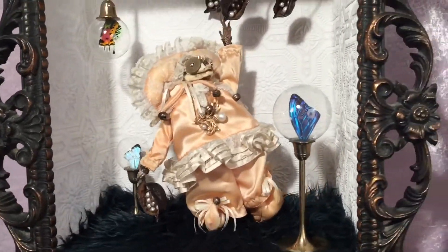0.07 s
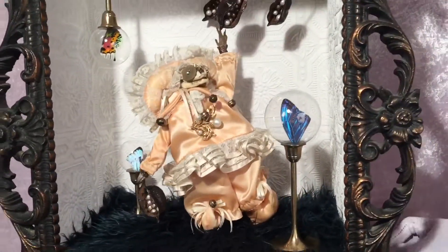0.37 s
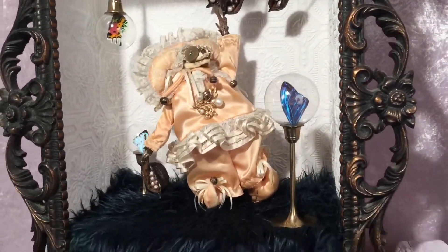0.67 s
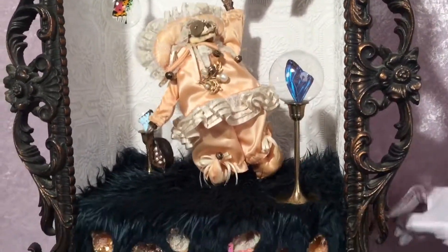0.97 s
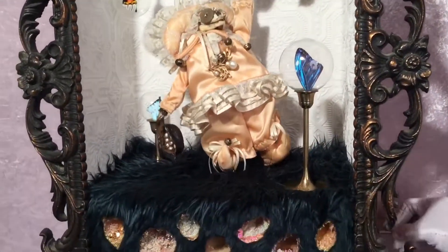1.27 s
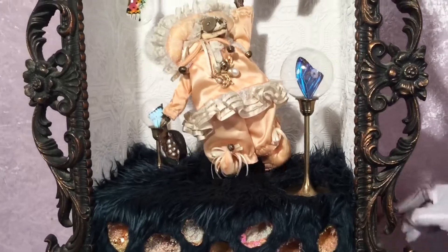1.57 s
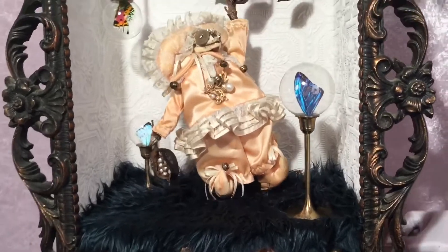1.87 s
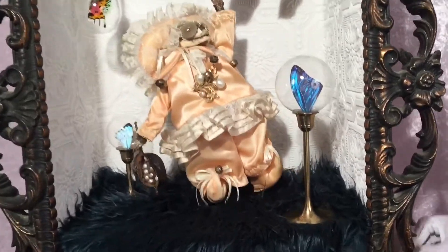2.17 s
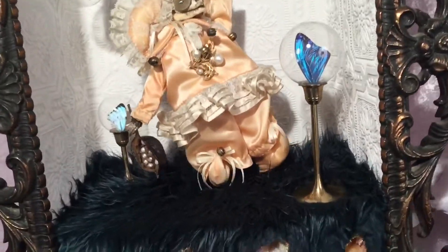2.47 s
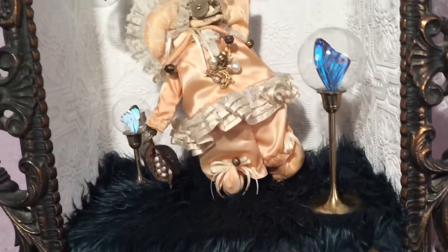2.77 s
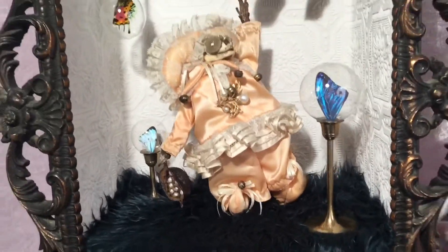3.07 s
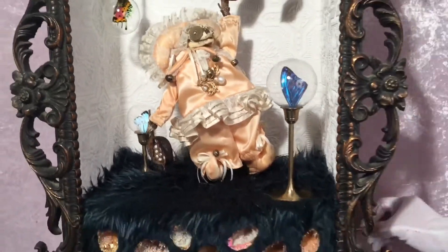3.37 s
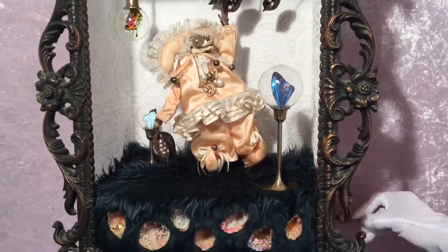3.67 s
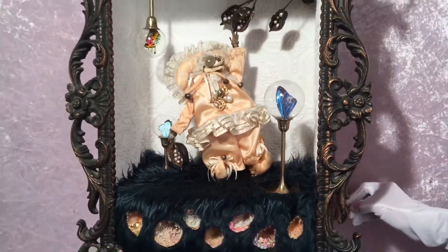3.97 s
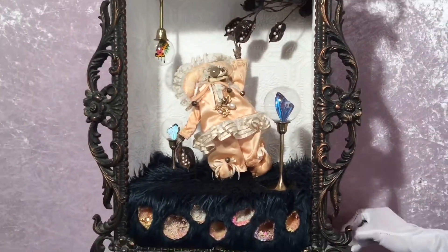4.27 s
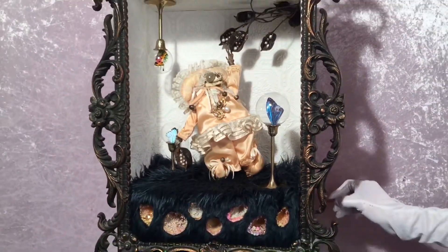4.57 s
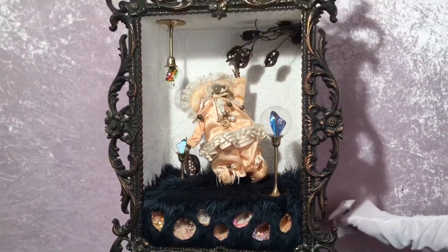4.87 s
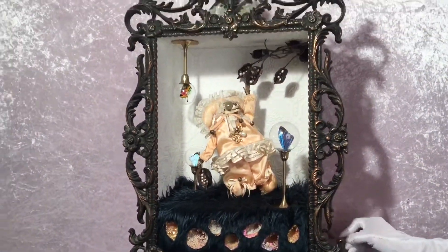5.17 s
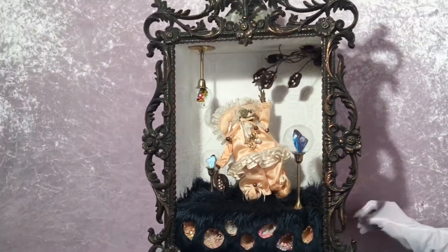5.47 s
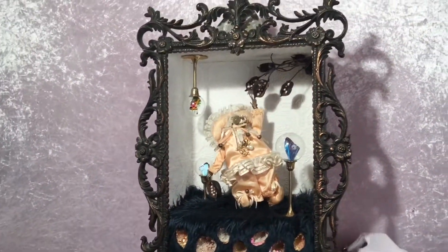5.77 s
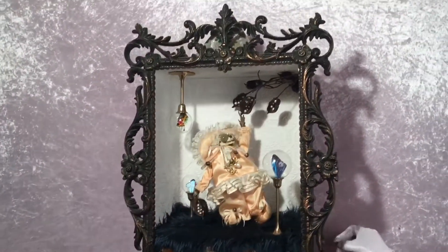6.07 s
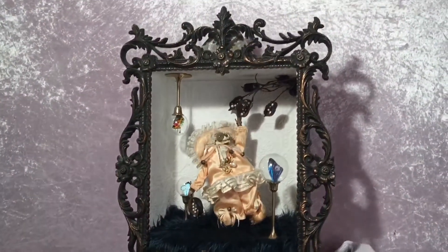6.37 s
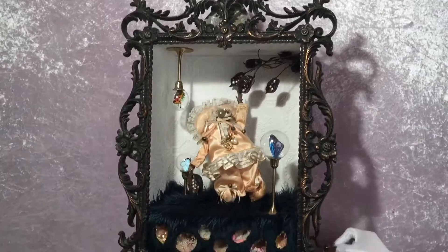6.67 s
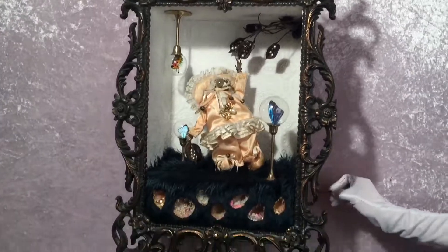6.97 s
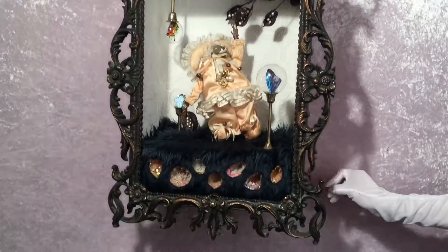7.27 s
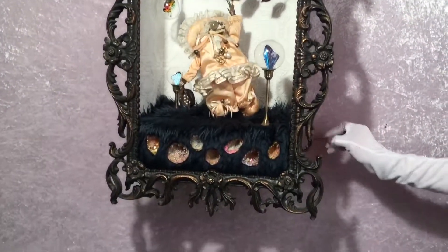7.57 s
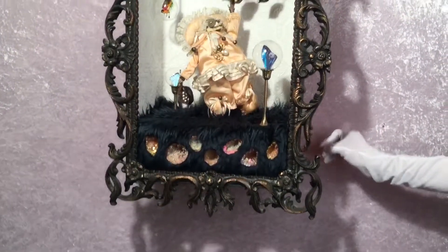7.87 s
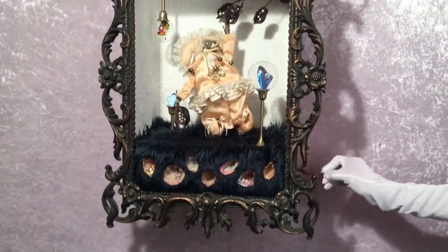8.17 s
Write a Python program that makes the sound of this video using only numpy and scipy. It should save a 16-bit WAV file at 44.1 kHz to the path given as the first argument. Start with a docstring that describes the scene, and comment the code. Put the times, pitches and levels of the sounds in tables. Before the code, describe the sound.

A hand-cranked wooden mechanism clacks and knocks in a repeating pattern while small metal trinkets jingle faintly in a quiet room.

```python
"""A hand-cranked cam works an automaton in a wooden wall case, about 0.7 s a turn, briskest at first.
Each turn the cam lifts its follower, a lever clucks, the cam drags and snaps past, and the follower
drops and rebounds. Each impact excites the damped modes of case, levers and wire links; stick-slip
friction drives the rubs and the shaft's murmur. Small metal trinkets jingle on the shaking figure.
Behind them, in a small quiet room, lie a low rumble and a drone and soft hiss that come and go."""
import sys
import numpy as np
from scipy import signal
from scipy.fft import rfft, irfft, next_fast_len
from scipy.io import wavfile
from scipy.ndimage import uniform_filter1d

SR = 44100
rng = np.random.default_rng(int(sys.argv[2]) if len(sys.argv) > 2 else 0)


def log_audio(samples):
    """Write samples as a 16-bit WAV file to the path given in sys.argv[1]."""
    # one column per channel
    frames = np.atleast_2d(samples).T
    # limit to full scale, then quantise
    limited = np.clip(frames, -1, 1)
    pcm = np.round(limited * 32767).astype(np.int16)
    wavfile.write(sys.argv[1], SR, pcm)


N = 370881
TIME = np.arange(N) / SR
AGE = np.arange(SR // 4) / SR  # time since a blow [s]

# the cam meets its follower: (time [s], strength [dB], lever pitch [Hz], tick [dB], rub after it [dB])
CAM_LIFTS = [(.627, 3.5, 910, -64, -46.5), (1.284, 3, 930, -61, -45), (1.945, 2, 900, -61.5, -46.5),
             (2.604, 5, 920, -60, -46.5), (3.418, -3, 740, -71, -49), (4.153, -2, 740, -72, -52.5),
             (4.943, -0.5, 712, -57, -52), (5.751, -4.5, 700, -51, -52), (6.476, -2, 708, -65, -54),
             (7.24, -1, 680, -75, -48.5), (7.978, -1.5, 723, -59, -51.5)]
# the cam snaps past: (time [s], strength [dB], tap before it [dB], drag [dB], lead of the tap [s])
CAM_SNAPS = [(0.125, 2.5, 3, -41, 0.024), (0.808, 1, 0.5, -45, 0.023), (1.482, 6.5, 6, -35, .019),
             (2.116, 3, 6.5, -39, 0.019), (2.784, -2, 2, -55, .028), (3.593, 3, 2.5, -41.5, 0.02),
             (4.33, -1, 2.5, -42.5, .023), (5.12, -2, 0, -44, .022), (5.908, 1.5, 3, -37, .018),
             (6.656, -2.5, 2, -41.5, 0.023), (7.396, 1.5, 3.5, -41, 0.021), (8.143, 1.5, 4, -42, 0.02)]
# the follower drops: (time [s], strength [dB], case pitch [Hz], lever pitch [Hz], hardness [dB])
FOLLOWER_DROPS = [(.289, 5, 214, 920, -0.5), (0.983, 1, 207, 825, 1), (1.616, 6.5, 193, 1080, -3.5),
                  (2.295, 3, 244, 915, 2), (2.991, 4, 293, 930, 0.5), (3.78, 0, 224, 623, 2.5),
                  (4.528, -0.5, 246, 1010, -3), (5.334, -0.5, 242, 770, -1.5), (6.06, -0.5, 253, 1000, -7),
                  (6.842, 0, 226, 1050, 0.5), (7.557, 2, 254, 964, -9), (8.292, 2, 246, 980, -4)]
# it lands again: (time [s], strength [dB], hardness [dB], case pitch [Hz], lever pitch [Hz])
FOLLOWER_REBOUNDS = [(.371, 3, 3, 330, 810), (1.063, -2, 0.5, 328, 685), (1.696, 1.5, 6.5, 346, 800),
                     (2.373, 4, 3, 323, 1020), (3.059, -5, -3, 180, 907), (3.842, -5, 5.5, 320, 770),
                     (4.588, -3.5, -14, 259.7, 934), (5.404, -4.5, -15, 175.5, 1045),
                     (6.121, -4.5, -5, 266, 710), (6.898, -10.5, -5, 259, 700),
                     (7.621, -3.5, -1.5, 255, 696), (8.364, -1.5, -3, 249, 720)]
# a lever swings over with a hollow cluck: (time [s], strength [dB])
LEVER_CLUCKS = [(.059, 1.5), (0.737, -0.5), (1.415, -3.5), (2.053, 2), (2.704, 4), (3.527, -0.5),
                (4.266, -1), (5.05, -3), (5.854, -2), (6.591, -3.5), (7.336, -0.5), (8.082, -2.5)]
# a lever jumps against its stop: (time [s], strength [dB]); the first row is the linkage clacking under a lift
# that began just before the sound starts
LEVER_JUMPS = [(.008, 0), (0.676, -8.5), (1.343, -1.5), (2.659, 1), (4.998, -8)]
# a lever bounces back on its stop: (time [s], strength [dB])
STOP_BOUNCES = [(3.612, -14), (4.345, -10), (5.924, -4.5), (6.135, -1), (6.673, -3), (7.416, -5),
                (7.637, 5), (8.16, -5), (8.377, 3.5)]
# a wire link shifts in its eye: (time [s], strength [dB], favoured pitch [Hz])
LINK_SHIFTS = [(0.408, -3.5, 2700), (1.152, -0.5, 1600), (1.733, 6.5, 1620), (2.317, -3, 1250),
               (6.04, -12, 1620), (7.484, -7, 1620)]
# the pawl ticks between the strokes: (time [s], strength [dB], lever pitch [Hz])
PAWL_CONTACTS = [(.58, -7, 900), (1.116, -4, 950), (1.246, 3, 644), (2.558, 0, 978), (2.955, 1.5, 950),
                 (3.158, 0.5, 850), (3.31, 0.5, 746), (3.358, 1.5, 950), (3.897, 3, 730), (4.43, -5, 902),
                 (4.645, -12, 930), (4.735, -3, 660), (4.86, -8, 889), (5.64, -4.5, 710),
                 (5.692, -3.5, 940), (6.183, -4, 940), (6.378, -8, 700), (6.42, 0, 956), (6.93, 0, 726),
                 (6.99, -0.5, 930), (7.141, -1, 714), (7.183, 1, 940), (7.69, -3, 930), (7.93, -2, 990)]
# a loose part bumps the case: (time [s], strength [dB], case pitch [Hz])
CASE_BUMPS = [(0.217, -1.5, 310), (0.272, 6, 312), (.458, -3.5, 210), (0.522, -10, 174), (.902, 1, 185),
              (.961, 0, 308), (1.151, -1.5, 190), (1.213, -4, 174), (1.558, 5, 195), (1.599, 8, 201),
              (1.847, -6.5, 179), (2.204, 0, 306), (2.277, 0.5, 340), (2.46, -2.5, 206), (2.524, -1, 169),
              (2.897, -0.5, 289.6), (3.158, -7.5, 160), (3.305, 0, 177), (3.751, 0.5, 202),
              (4.426, -9, 167.1), (4.862, -4, 170.3), (5.99, -1, 183), (6.038, 4, 193), (6.22, -8, 180),
              (6.753, -5.5, 176), (7.477, -1, 183), (7.543, 2.5, 240), (8.225, 1.5, 196), (8.279, 0, 252)]
# briskness of the crank: (time [s], gain on slack knocks and shaft [dB])
CRANK_VIGOUR = [(0, 8), (1.6, 6), (2.6, 8.5), (3.3, 5), (4.7, 2), (5.6, 3), (6.3, -1.5), (7.8, -3),
                (8.4, 5)]
# trinkets strike each other: (time [s], level [dB], favoured pitch [Hz])
TRINKET_CLINKS = [(.038, -52, 14230), (.06, -55, 14230), (.205, -48, 14290), (.39, -47, 14150),
                  (.438, -45, 14240), (.507, -52, 14650), (1.087, -52, 14580), (1.625, -45, 14220),
                  (1.755, -39, 13500), (1.778, -36, 14200), (1.8, -40, 12630), (2.117, -59, 14700),
                  (2.147, -44, 14690), (2.43, -35, 15600), (2.447, -25.5, 14200), (2.5, -38, 14240),
                  (2.682, -63, 13570), (3.063, -65, 14490), (3.123, -58, 14330), (3.862, -48, 14270),
                  (4.234, -59, 14350), (4.609, -52, 14180), (5.536, -69, 13610), (5.825, -68, 14350),
                  (6.141, -57, 12590), (6.191, -64, 14520), (7.316, -53, 14360), (7.43, -67, 13600),
                  (7.623, -62, 13610), (7.638, -61, 14400), (7.766, -68, 13610), (8.394, -64, 12960)]
# spells in which trinkets keep brushing: (start [s], length [s], level [dB], favoured pitch [Hz])
JINGLE_SPELLS = [(0.407, 0.088, -43, 15400), (0.495, 0.079, -60, 14700), (0.646, 0.085, -59, 14600),
                 (.81, 0.19, -70, 14700), (1.098, 0.14, -57.5, 14200), (1.308, 0.05, -72, 15900),
                 (1.723, 0.085, -41, 15400), (1.836, 0.09, -55, 14600), (1.932, 0.115, -51, 14650),
                 (2.405, .12, -42, 14800), (2.613, 0.16, -71, 14500), (5.394, 0.15, -76, 13700),
                 (5.806, 0.21, -73, 13500), (6.897, 0.057, -73, 14200), (7.673, .04, -66, 14500)]
# small beads tick together: (time [s], level [dB])
BEAD_TICKS = [(.136, -57.5), (.808, -77), (.821, -71), (.892, -67), (1.086, -59), (1.13, -60.5),
              (1.841, -55.5), (2.209, -66), (2.519, -55), (2.549, -67), (2.788, -74), (3.034, -64),
              (3.17, -68), (3.911, -63), (6.191, -66.5), (7.406, -60), (7.622, -65)]
# low drone: (time [s], pitch [Hz], fundamental [dB], octave [dB])
DRONE_COURSE = [(1.55, 50.8, -73, -69), (1.77, 51.16, -48.5, -52), (2.3, 54.2, -57, -51),
                (2.65, 56.5, -59, -53), (2.85, 56.8, -70, -56), (3.05, 60.8, -62, -43.5),
                (3.25, 62.6, -50, -44.5), (3.5, 63.4, -67, -64), (3.95, 71, -60.5, -55.5),
                (4.2, 74, -57.5, -49), (4.55, 78.9, -46.5, -50.5), (4.88, 79.8, -41.5, -44),
                (5, 75.6, -57.5, -60), (5.3, 74.3, -66, -85)]
# course of the low rumble: (time [s], level [dB])
RUMBLE_LEVELS = [(0, -50), (1, -59.5), (2.8, -53), (4, -60), (5.7, -58.5), (6.4, -65), (8.4, -67)]

# normal modes of each body: (frequency [Hz], level [dB], t60 [s])
CASE_MODES = [(168.5, -7.5, 0.2), (187.4, 2, 0.12), (217.5, -1, 0.09), (244.1, 1, 0.1), (264.7, -0.5, .15),
              (310.2, -1.5, 0.17), (341.3, -2.5, .08), (379.6, -3, 0.15), (431.2, -2.5, 0.18),
              (521, -10.5, 0.17), (550, -5.5, 0.11)]
LEVER_MODES = [(677, -8.5, 0.038), (706.5, -3.5, 0.16), (738.7, -3, 0.081), (854.6, -2, 0.073),
               (885, -1.5, 0.021), (933.7, 0.5, 0.076), (958.4, -5, 0.11), (1130, -8, 0.051)]
LINK_MODES = [(1238, 8.5, 0.038), (1383, -0.5, .04), (1572, 1, 0.05), (1624, 0.5, 0.068), (1747, -5, 0.044),
              (1894, -10, 0.042), (2090, -8, 0.057), (2410, -8, 0.048), (2667, -6.5, 0.02),
              (2977, -11.5, 0.03), (3364, -8.5, 0.013), (3380, 2.5, 0.014), (3926, -7.5, 0.027),
              (4576, -7.5, 0.026), (6220, -18.5, 0.035)]
FOLLOWER_MODES = [(1050, 8, 0.012), (1210, -23, 0.065), (1613, 20.5, 0.038), (1515, 5, 0.065),
                  (1828, -2, 0.11), (2600, -19.5, 0.036), (3270, -14, 0.022)]
TRINKET_MODES = [(7100, -19, .04), (12630, -2, .04), (13500, -3, .045), (14200, 0, .07), (14350, -4, .04),
                 (14700, -1, .04), (14950, -5, .03), (15600, -3, .04)]

# spectral envelope of each noise: (frequency [Hz], relative level [dB])
CONTACT_SPECTRUM = [(600, -9), (1100, 10.5), (1600, -9), (2000, -5), (2800, -6.5), (3400, -13.5),
                    (4200, -16.5), (4750, -18), (5600, -19.5), (7400, -36), (16000, -37.5)]
CLINK_SPECTRUM = [(4000, -32), (6200, -5), (7200, -1), (10000, -7), (12500, -1.5), (14500, -3.5),
                  (16000, -3.5)]
BEAD_SPECTRUM = [(3000, -39), (5800, -5.5), (7100, 1.5), (8200, -14), (9500, 2), (11200, -4), (12500, 0),
                 (16000, -3)]
SHAFT_SPECTRUM = [(40, -24), (80, -23), (120, -18.5), (170, 1.5), (310, -1.5), (480, -10.5), (720, -7),
                  (950, -18), (1150, -17.5), (1650, -24), (2300, -32.5), (4000, -34.5), (8000, -67)]
RUMBLE_SPECTRUM = [(20, -30), (48, -3), (75, -5.5), (120, 1.5), (220, -17), (600, -47.5)]
HISS_SPECTRUM = [(800, 1), (2000, 9.5), (4000, 4.5), (6000, 0), (7500, -9), (9500, 1.5), (11500, -8),
                 (16000, -7)]
AIR_SPECTRUM = [(12, -64), (25, -33.5), (50, -6.5), (100, -15), (175, -1), (260, 4), (450, -36), (700, -51),
                (1260, -26), (3000, -29.5), (6000, -35), (14500, -43), (16000, -38.5)]


def knock(db, thump_db, clack_db, tick_db, case_hz, lever_hz, link_hz=1500, rattle_s=0.01):
    """Impact excitation: contact and links respond first, then the lever, last the heavy case."""
    struck = favour(CASE_MODES, case_hz, width_hz=29.3, depth_db=11.5)
    thump = ring(CASE_MODES, scatter_db=4, detune=0.0093, favour_db=struck, spread=0.25) * swell(0.0023)
    struck = favour(LEVER_MODES, lever_hz, width_hz=110, depth_db=10.5)
    clack = ring(LEVER_MODES, scatter_db=4.5, detune=0.014, favour_db=struck, spread=0.14)
    clack = clack * swell(0.0012) * np.exp(-AGE / 0.15)  # the stop damps the lever
    struck = favour(LINK_MODES, link_hz, width_hz=590, depth_db=9.5)
    link = ring(LINK_MODES, scatter_db=5, detune=0.024, favour_db=struck) * swell(0.00062)
    bounces = chatter(gap_s=0.0064, fade_s=rattle_s, contact_s=0.0025)
    tick = shape(rng.standard_normal(len(AGE)) * bounces * swell(0.0013), CONTACT_SPECTRUM)
    contact = unit(link) + amp(-0.5) * unit(tick)
    return amp(db) * (blow(thump, thump_db) + blow(clack, clack_db) + blow(contact, tick_db))


def cam_lifts(take_up_s=0.026):
    """Transmitted impact: the cam thuds on the follower, then the linkage clacks under the load."""
    out = np.zeros(N)
    for s, db, lever_hz, tick_db, _ in CAM_LIFTS:
        add(out, s, knock(db, thump_db=-31, clack_db=-49.5, tick_db=tick_db,
                          case_hz=206.5, lever_hz=lever_hz, link_hz=2900))
        add(out, s + take_up_s,
            knock(db, thump_db=-42.5, clack_db=-42, tick_db=-55, case_hz=295, lever_hz=1026))
    return out


def cam_drag(lead_s=0.0074, rise_s=0.0083, release_s=0.019):
    """Stick-slip friction: the cam drives the follower ever harder and lets go just before the snap."""
    force = np.zeros(N)
    for s, _, _, db, _ in CAM_SNAPS:
        since = TIME - s + lead_s
        force += amp(db) * np.exp(np.where(since < 0, since / rise_s, -since / release_s))
    slips = friction(depth_db=15, rate_hz=220)
    follower = ring(FOLLOWER_MODES + LINK_MODES, scatter_db=-2.5, detune=0.0032) * swell(0.00051)
    return force * unit(drive(slips, follower))


def cam_snaps():
    """Sudden release: a wooden tap, then a short, bright snap as the cam's lobe passes."""
    out = np.zeros(N)
    for s, db, tap_db, _, lead_s in CAM_SNAPS:
        snap_hz = 3500 + 250 * np.tanh(rng.standard_normal())
        add(out, s - lead_s,
            knock(tap_db, thump_db=-43, clack_db=-41, tick_db=-55, case_hz=540, lever_hz=1017))
        add(out, s, knock(db, thump_db=-37, clack_db=-43, tick_db=-43.5,
                          case_hz=202, lever_hz=700, link_hz=snap_hz, rattle_s=0.0056))
    return out


def follower_drops(landing_s=0.0055, rock_s=0.021):
    """Inelastic collision: the follower grazes, lands, rocks and rebounds; hard contact is brighter."""
    out = np.zeros(N)
    for s, db, case_hz, lever_hz, hard_db in FOLLOWER_DROPS:
        add(out, s, knock(db, thump_db=-36.5, clack_db=-42 + hard_db / 2, tick_db=-44 + hard_db,
                          case_hz=365, lever_hz=lever_hz, rattle_s=0.0091))
        add(out, s + landing_s,
            knock(db, thump_db=-29, clack_db=-43.5, tick_db=-53.5, case_hz=case_hz, lever_hz=lever_hz))
        add(out, s + rock_s,
            knock(db, thump_db=-39, clack_db=-49.5, tick_db=-56.5 + hard_db, case_hz=251, lever_hz=774))
    for s, db, hard_db, case_hz, lever_hz in FOLLOWER_REBOUNDS:
        add(out, s, knock(db, thump_db=-34.5 + hard_db / 2, clack_db=-33.5, tick_db=-45 + hard_db,
                          case_hz=case_hz, lever_hz=lever_hz, link_hz=2900, rattle_s=0.017))
    return out


def follower_rubs(lag_s=0.027, width_s=0.0085, slide_db=-49.5, rattle_db=-52.5):
    """Sliding friction shakes the links after each lift, at the lobe's edge and as they settle."""
    force = sum(amp(db) * bell(TIME - s - lag_s, width_s) for s, *_, db in CAM_LIFTS)
    settling = np.zeros(N)
    for s, db, *_ in FOLLOWER_DROPS:
        force += amp(slide_db + db / 2) * np.exp(-np.abs(TIME - s) / 0.0083)
        add(settling, s, amp(rattle_db + db / 2) * surge(0.011))
    grains = friction(depth_db=9, rate_hz=300)
    links = unit(drive(grains, ring(LINK_MODES, scatter_db=3, detune=0.006)))
    linkage = ring(LEVER_MODES + LINK_MODES, scatter_db=8.5, detune=0.002) * swell(0.0015)
    rub = amp(-1) * links + amp(0.5) * shape(grains, CONTACT_SPECTRUM)
    return force * rub + settling * unit(drive(grains, linkage))


def levers(graze_lead_s=0.007, graze_db=-44.5):
    """Struck wooden bars: a lever grazes its seat and clucks each turn; some jump against a stop."""
    out = np.zeros(N)
    for s, db in LEVER_CLUCKS:
        scuff = rng.standard_normal(len(AGE)) * surge(0.0068)
        wood = ring(LEVER_MODES, scatter_db=2, detune=0.01) * swell(0.00041) * np.exp(-AGE / 0.0075)
        add(out, s - graze_lead_s, blow(drive(scuff, wood), db + graze_db))
        add(out, s, knock(db, thump_db=-48.5, clack_db=-34.5, tick_db=-61,
                          case_hz=312, lever_hz=945, link_hz=1640))
    for s, db in LEVER_JUMPS:
        add(out, s, knock(db, thump_db=-37.5, clack_db=-31, tick_db=-44,
                          case_hz=337, lever_hz=910, link_hz=2560, rattle_s=0.0033))
    return out


def lever_bounces():
    """Free vibration: a slowly turned lever bounces once more and rings on hollow."""
    out = np.zeros(N)
    struck = favour(LEVER_MODES, 728, width_hz=77, depth_db=12.5)
    for s, db in STOP_BOUNCES:
        wood = ring(LEVER_MODES, scatter_db=0.5, detune=0.0088, favour_db=struck, spread=0.19)
        add(out, s, blow(wood * swell(0.002), db - 40.5))
    return out


def link_clicks():
    """Light impact: now and then a wire link shifts in its eye."""
    out = np.zeros(N)
    for s, db, link_hz in LINK_SHIFTS:
        add(out, s, knock(db, thump_db=-43.5, clack_db=-47, tick_db=-48.5,
                          case_hz=302, lever_hz=910, link_hz=link_hz))
    return out


def link_creak(level_db=-62.5, lead_s=0.02, width_s=0.11):
    """Stick-slip friction: under load a wire link slips in tiny jerks and sings around each cluck."""
    force = sum(bell(TIME - s + lead_s, width_s) for s, _ in LEVER_CLUCKS)
    slips = friction(depth_db=9.8, rate_hz=140)
    struck = favour(LINK_MODES, 1680, width_hz=390, depth_db=12)
    wire = ring(LINK_MODES, scatter_db=6, detune=0.003, favour_db=struck) * swell(0.0006)
    return amp(level_db) * force * unit(drive(slips, wire))


def pawl(rise_s=0.00211):
    """Transient excitation: the pawl slides onto a tooth and the scuff rings a damped lever."""
    out = np.zeros(N)
    for s, db, lever_hz in PAWL_CONTACTS:
        scuff = rng.standard_normal(len(AGE)) * surge(rise_s)
        struck = favour(LEVER_MODES, lever_hz, width_hz=170, depth_db=11)
        wood = ring(LEVER_MODES, scatter_db=6, detune=0.0058, favour_db=struck)
        wood = wood * swell(0.0011) * np.exp(-AGE / 0.033)
        add(out, s - rise_s, blow(drive(scuff, wood), db - 51.5))
    return out


def slack(strokes, lag_s, jitter_s=0.00387, scatter_db=6, **contact):
    """Clearance: a loose part knocks unevenly near each stroke, harder when the crank is brisk."""
    out = np.zeros(N)
    for s, *_ in strokes:
        late, size = np.tanh(rng.standard_normal(2))
        add(out, s + lag_s + jitter_s * late, knock(vigour(s) + scatter_db * size, **contact))
    return out


def loose_play():
    """Backlash: gears knock twice before a lift, the follower settles, loose parts bump the case."""
    out = slack(CAM_LIFTS, -0.096, thump_db=-43.5, clack_db=-66.5, tick_db=-75,
                case_hz=182, lever_hz=714)
    out += slack(CAM_LIFTS, -0.054, thump_db=-52.5, clack_db=-61.5, tick_db=-75,
                 case_hz=181, lever_hz=880)
    out += slack(FOLLOWER_REBOUNDS, 0.044, thump_db=-56, clack_db=-54, tick_db=-70,
                 case_hz=294, lever_hz=784)
    for s, db, case_hz in CASE_BUMPS:
        add(out, s, knock(db, thump_db=-38, clack_db=-52, tick_db=-65.5, case_hz=case_hz, lever_hz=910))
    return out


def clink(hz, db, hard_db=0):
    """Metal contact excites very high modes and a buzz; a lighter touch builds up more slowly."""
    struck = favour(TRINKET_MODES, hz, width_hz=300, depth_db=24)
    onset = swell(np.interp(db, [-65, -40], [0.0022, 0.0003]))
    metal = ring(TRINKET_MODES, scatter_db=-2.5, detune=0.0055, favour_db=struck, spread=0.1)
    metal = metal * onset * np.exp(-AGE / 0.055)  # neighbouring pieces damp each other
    touches = chatter(gap_s=0.009, fade_s=0.014, contact_s=0.001)
    tick = shape(rng.standard_normal(len(AGE)) * touches * onset, CLINK_SPECTRUM)
    tick_db = -60 + 0.58 * (db + 50)  # the tick grows more slowly than the ring
    return blow(metal, db) + blow(tick, tick_db + hard_db)


def trinkets(touch_gap_s=0.064, spread_hz=190):
    """Collisions of swinging pieces: single clear clinks, and spells of softer repeated touches."""
    out = np.zeros(N)
    for s, db, hz in TRINKET_CLINKS:
        add(out, s, clink(hz, db))
    for start, length, db, hz in JINGLE_SPELLS:
        offsets = np.arange(0, length, touch_gap_s)
        for offset, (late, pitch, size) in zip(offsets, rng.standard_normal((20, 3))):
            touch = clink(hz + spread_hz * pitch, db - 0.5 + 3.6 * np.tanh(size), hard_db=-12.5)
            add(out, start + offset + 0.018 * abs(late), touch)
    return out


def shimmer(touches_per_s=300, ring_on_hz=14360):
    """Random impulses sustain the trinkets' modes in a spell; one piece rings on after each drop."""
    out = np.zeros(N)
    for start, length, db, hz in JINGLE_SPELLS:
        force = amp(db - 5) * np.exp(-(2 * AGE / length - 1) ** 4)
        touches = rng.standard_normal(len(AGE)) * (rng.random(len(AGE)) < touches_per_s / SR)
        struck = favour(TRINKET_MODES, hz, width_hz=300, depth_db=27)
        metal = ring(TRINKET_MODES, scatter_db=-8, detune=0.002, favour_db=struck)
        add(out, start, force * unit(drive(touches, metal)))
    for s, db, *_ in FOLLOWER_DROPS:
        gain = amp(db - 77 + 4 * np.tanh(rng.standard_normal()))
        add(out, s, gain * surge(0.02) * np.sin(2 * np.pi * ring_on_hz * AGE))
    return out


def beads():
    """Brief contact has a broad spectrum: beads give dry, bright ticks with hardly any ring."""
    out = np.zeros(N)
    for s, db in BEAD_TICKS:
        touch = rng.standard_normal(len(AGE)) * swell(0.00078) * np.exp(-AGE / 0.0013)
        add(out, s, blow(shape(touch, BEAD_SPECTRUM), db))
    return out


def shaft():
    """Forced vibration: uneven bearing friction keeps the case and levers murmuring."""
    jerks = amp(10.8 * np.tanh(walk(55)))
    rub = shape(rng.standard_normal(N) * jerks, SHAFT_SPECTRUM)
    wood = ring(CASE_MODES + LEVER_MODES, scatter_db=2, detune=0.0024) * swell(0.000923)
    murmur = unit(drive(rng.standard_normal(N) * jerks, wood))
    return shaft_effort() * (amp(-5.5) * rub + amp(-11.5) * murmur)


def shaft_effort():
    """Powers add: free running, the load around each cluck and the shudder after each drop."""
    running = amp(-53.5 + vigour(TIME))
    load = sum(amp(-44) * bell(TIME - s, width_s=0.15) for s, _ in LEVER_CLUCKS)
    shudder = np.zeros(N)
    for s, db, *_ in FOLLOWER_DROPS:
        add(shudder, s, amp(-39.5 + db / 2) * surge(0.038))
    return np.sqrt(running ** 2 + load ** 2 + shudder ** 2)


def drone(waver=0.005):
    """Two harmonics: a low, wavering hum and its octave glide upward, then sag and fade."""
    times, *columns = np.transpose(DRONE_COURSE)
    hz, low_db, octave_db = (np.interp(TIME, times, column) for column in columns)
    phase = 2 * np.pi * np.cumsum(hz * (1 + waver * walk(8.14))) / SR
    low, octave = amp(low_db + 2 * walk(12)), amp(octave_db + 2 * walk(12))
    return low * np.sin(phase) + octave * np.sin(2 * phase)


def rumble():
    """Amplitude-modulated low noise: a soft, uneven rumble, weaker in the last seconds."""
    level = amp(np.interp(TIME, *np.transpose(RUMBLE_LEVELS)) + 2 * walk(6))
    return level * shape(rng.standard_normal(N), RUMBLE_SPECTRUM)


def hiss(peak_s=4.966, rise_s=0.19, fall_s=0.31, peak_db=-62):
    """Broadband noise under a lopsided Gaussian envelope: a soft, grainy hiss swells once."""
    level = amp(peak_db) * bell(TIME - peak_s, np.where(TIME < peak_s, rise_s, fall_s))
    return level * shape(rng.standard_normal(N) * amp(1.3 * walk(83)), HISS_SPECTRUM)


def room(x, t60_s, treble_t60_s, wet_db, rise_s):
    """Reverberation: close walls return a short tail whose treble is absorbed first."""
    noise = rng.standard_normal(len(AGE))
    low = signal.sosfilt(signal.butter(1, 2500, fs=SR, output="sos"), noise)
    tail = low * amp(-60 * AGE / t60_s) + (noise - low) * amp(-60 * AGE / treble_t60_s)
    tail = tail * swell(rise_s)
    return x + amp(wet_db) * drive(x, tail / np.sqrt(np.sum(tail ** 2)))


def ring(modes, scatter_db, detune, favour_db=0, spread=1):
    """Modal superposition: each blow weights the modes anew; a small spread starts them in phase."""
    hz, db, t60 = np.transpose(modes)
    weight, shift, start = rng.standard_normal((3, len(hz)))
    phase = 2 * np.pi * (np.outer(hz * (1 + detune * shift), AGE) + spread * start[:, None])
    decay = -np.log(1000) * np.outer(1 / t60, AGE)
    partials = np.sin(phase.astype(np.float32)) * np.exp(decay.astype(np.float32))
    return amp(db + favour_db + scatter_db * weight) @ partials


def favour(modes, hz, width_hz, depth_db):
    """Selective excitation: gains [dB] that weaken the modes far from hz."""
    return depth_db * (bell(np.array(modes)[:, 0] - hz, width_hz) - 1)


def chatter(gap_s, fade_s, contact_s, count=5, bounce_db=-7):
    """Rebounds lose energy: the envelope of a firm contact and its weakening bounces."""
    landings = np.r_[0, np.cumsum(gap_s * rng.uniform(0.4, 1.6, count))]
    since = AGE - landings[:, None]
    sizes = np.exp(-landings / fade_s) * amp(bounce_db * (landings > 0))
    return sizes @ ((since >= 0) * np.exp(-np.abs(since) / contact_s))


def friction(depth_db, rate_hz):
    """Stick-slip force: noise whose level jerks up and down at random."""
    return rng.standard_normal(N) * amp(depth_db * np.tanh(walk(rate_hz)))


def drive(force, response):
    """Linear response: convolve an excitation with an impulse response."""
    return signal.fftconvolve(force, response)[:len(force)]


def shape(x, spectrum):
    """Filter by a spectral envelope of (frequency [Hz], level [dB]) points; rms 1."""
    hz, db = np.transpose(spectrum)
    size = next_fast_len(len(x) + len(AGE))
    bins = np.maximum(np.arange(size // 2 + 1) * SR / size, 1)
    gain = amp(np.interp(np.log(bins), np.log(hz), db))
    return unit(irfft(rfft(x, size) * gain, size)[:len(x)])


def vigour(s):
    """Briskness of the crank [dB] at a time."""
    return np.interp(s, *np.transpose(CRANK_VIGOUR))


def swell(rise_s):
    """Onset envelope that builds smoothly to 1."""
    return (1 - np.exp(-AGE / rise_s)) ** 2


def surge(peak_s):
    """Envelope that rises to 1 and dies away more slowly."""
    return AGE / peak_s * np.exp(1 - AGE / peak_s)


def bell(offset, width_s):
    """Gaussian curve of height 1."""
    return np.exp(-(offset / width_s) ** 2)


def walk(rate_hz):
    """Smooth random fluctuation of rms 1."""
    hold = int(SR / rate_hz)
    steps = np.repeat(rng.standard_normal(N // hold + 1), hold)
    return unit(uniform_filter1d(steps, hold)[:N])


def blow(x, db):
    """Give a blow the energy of 20 ms at this level."""
    return x * amp(db) / np.sqrt(np.sum(x ** 2) / (SR / 50))


def amp(db):
    """Decibels to gain."""
    return 10 ** (np.asarray(db) / 20)


def unit(x):
    """Scale to rms 1."""
    return x / np.sqrt(np.mean(x ** 2))


def add(track, s, x):
    """Mix a sound in at a time [s]."""
    start = int(np.clip(s * SR, 0, N))
    track[start:start + len(x)] += x[:N - start]


def scene():
    """Superposition: mechanism and trinkets reverberate in the room, over the soft background."""
    works = (cam_lifts() + levers() + link_creak() + cam_drag() + follower_rubs() + cam_snaps()
             + follower_drops() + link_clicks() + lever_bounces() + pawl() + loose_play())
    # the small case radiates little below 94 Hz
    works = signal.sosfilt(signal.butter(2, 94, "highpass", fs=SR, output="sos"), works)
    mechanism = room(works, t60_s=0.2, treble_t60_s=0.09, wet_db=-12, rise_s=0.0024)
    ornaments = trinkets() + beads() + shimmer()
    jingle = room(ornaments, t60_s=0.22, treble_t60_s=0.049, wet_db=-7, rise_s=0.0019)
    air = amp(-56.5) * shape(rng.standard_normal(N), AIR_SPECTRUM)
    return (mechanism + jingle + shaft() + drone() + rumble() + hiss() + air)[None]


def record(dry):
    """Band limiting: a steep low-pass removes the treble above 15950 Hz."""
    return signal.sosfilt(signal.ellip(10, 0.2, 70, 15950, fs=SR, output="sos"), dry)


dry = scene()
out = record(dry)
log_audio(out)
```